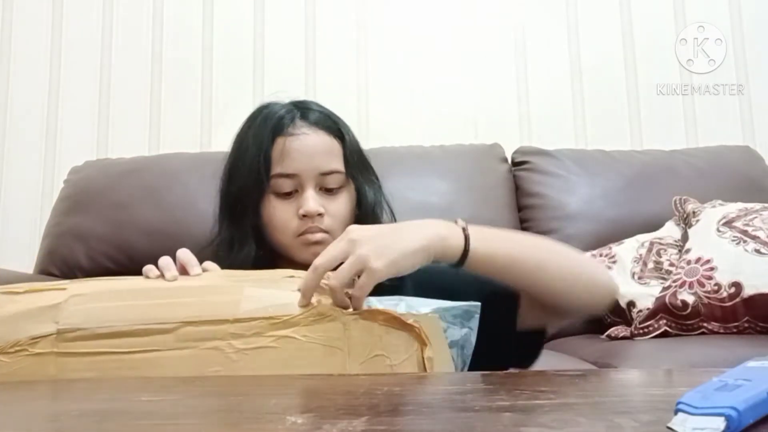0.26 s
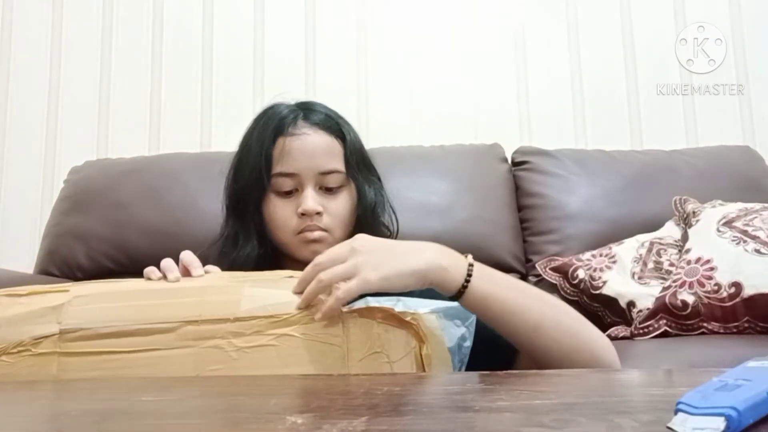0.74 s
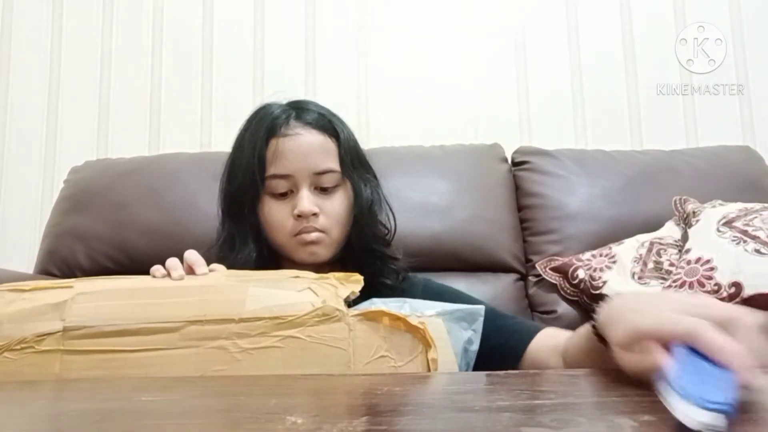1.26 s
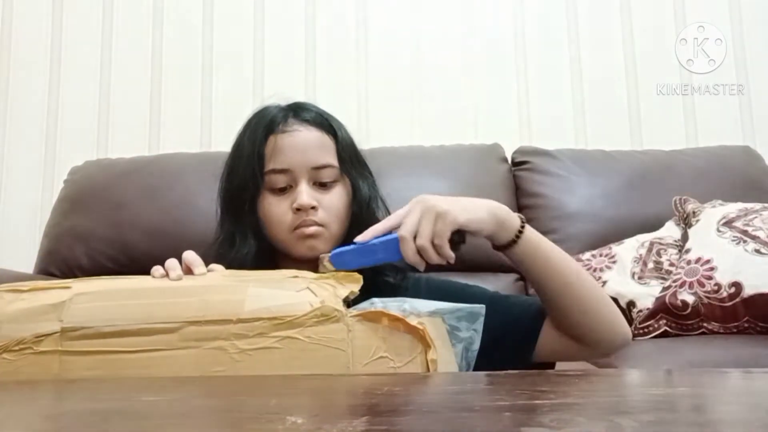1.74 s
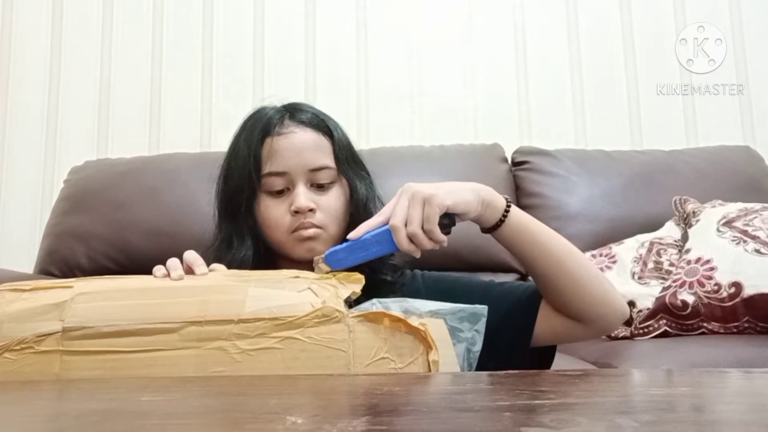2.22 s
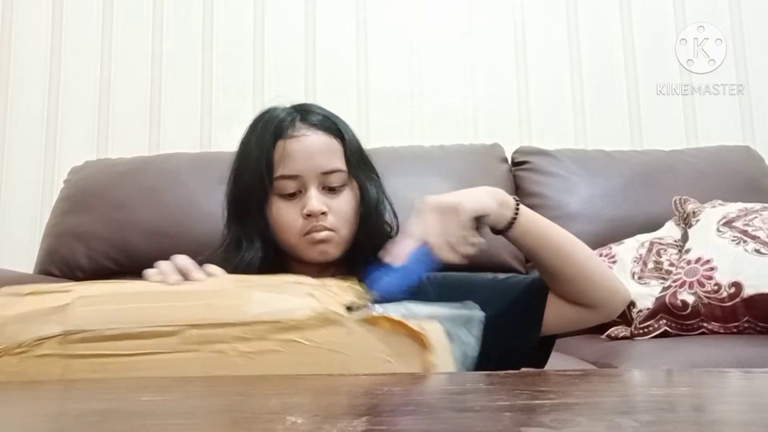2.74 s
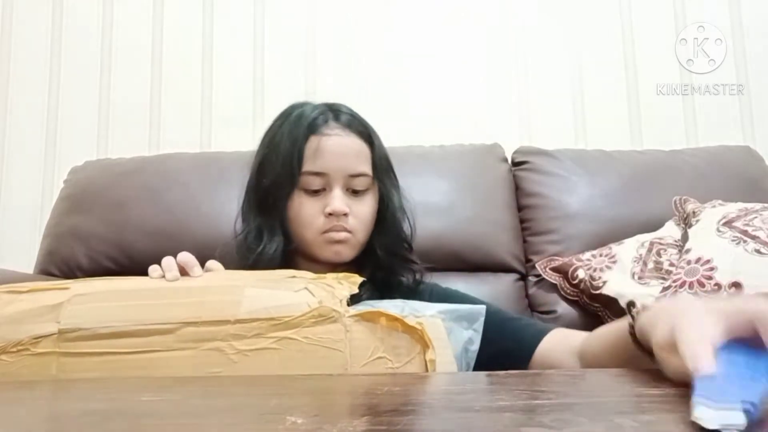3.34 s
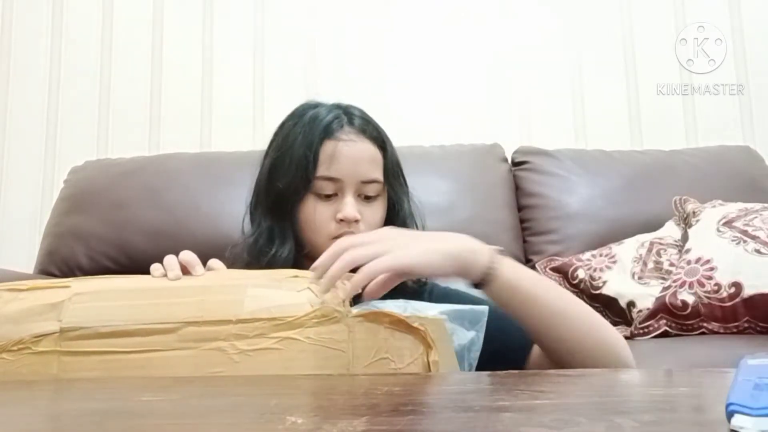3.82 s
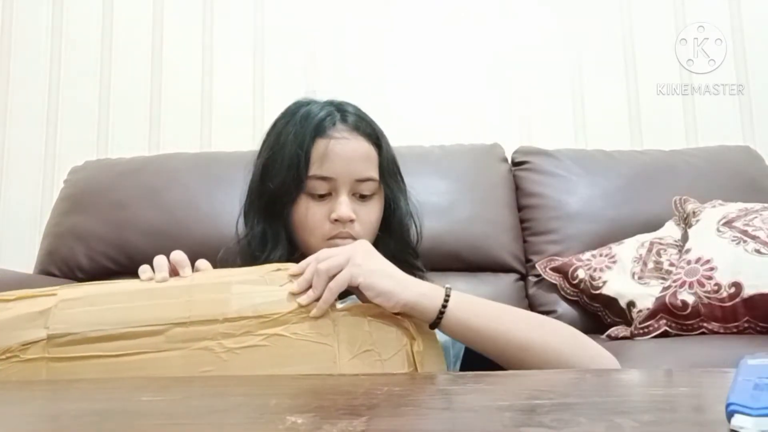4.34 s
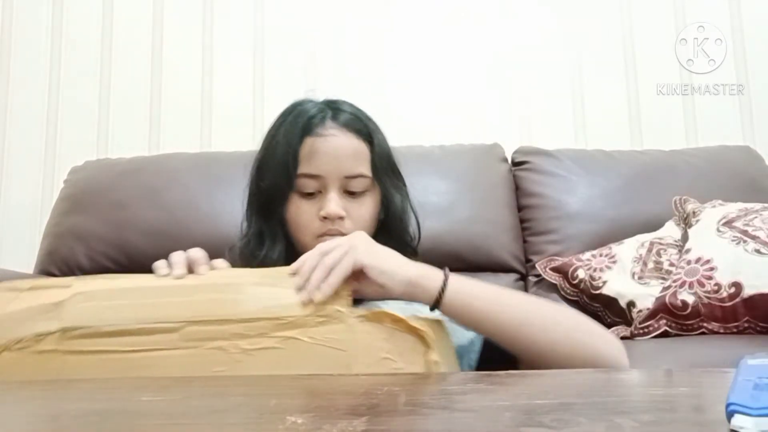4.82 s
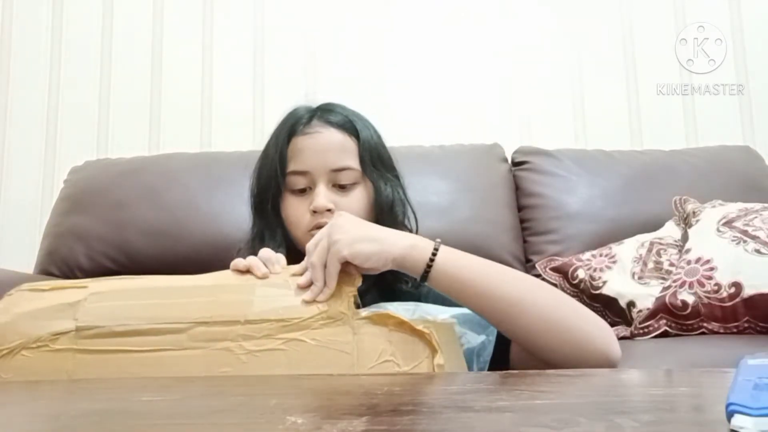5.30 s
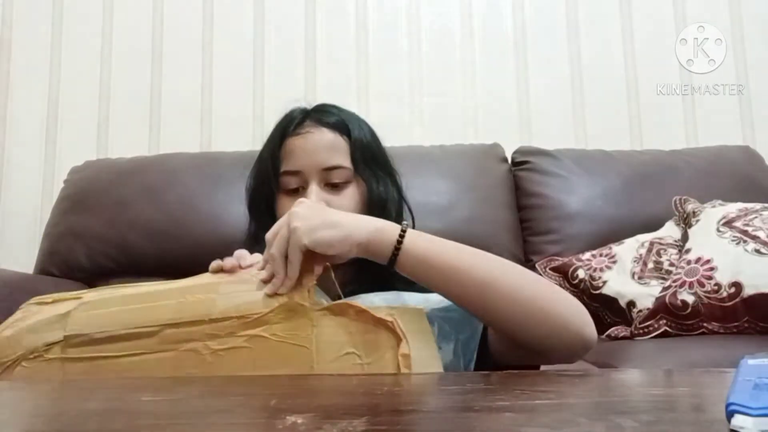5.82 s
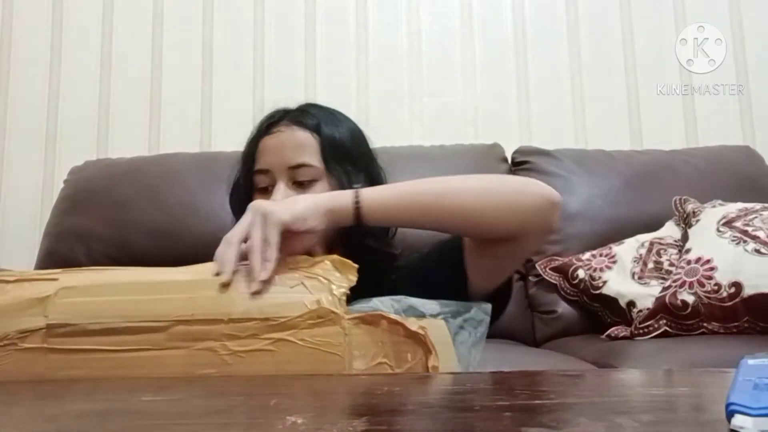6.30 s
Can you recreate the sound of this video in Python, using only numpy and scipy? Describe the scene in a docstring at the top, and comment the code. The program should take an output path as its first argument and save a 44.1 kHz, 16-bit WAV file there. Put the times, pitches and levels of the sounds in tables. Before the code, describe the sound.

Short rips and snaps of tape on a cardboard box, broken by one blade stroke and two clatters of a cutter on wood.

```python
"""A cardboard parcel is opened close to a phone in a living room, over a low rumble and a faint high hiss.
First the tape is picked at: its glue lets go in dense crackle and single snaps. At 1 s a plastic cutter
knocks on the wooden table as it is taken up. From 2.3 s it slits the tape in one stroke, jolting the
box, and at 3.3 s it is laid back, bouncing. From 3.9 s tape and wrap are peeled off in short pulls.
The room rings for half a second after each sound."""
import sys
import numpy as np
from scipy import signal
from scipy.fft import rfft, irfft
from scipy.io import wavfile
from scipy.ndimage import uniform_filter1d

SR = 44100
rng = np.random.default_rng(int(sys.argv[2]) if len(sys.argv) > 2 else 0)


def file_out(sig):
    """Save sig as 16-bit WAV at sys.argv[1]."""
    # one column per channel
    cols = np.atleast_2d(sig).T
    # limit, then scale
    lim = np.clip(cols, -1, 1)
    pcm = np.round(lim * 32767).astype(np.int16)
    wavfile.write(sys.argv[1], SR, pcm)


N = 289370
T = np.arange(N) / SR
SIDES = np.array([[.5], [-.5]])  # pan_db is left minus right


def undb(db):
    return 10 ** (np.asarray(db) / 20)


def unit_rms(x):
    return x / np.sqrt(np.mean(x ** 2))


def band(x, lo_hz, hi_hz, order=2):
    sos = signal.butter(order, [lo_hz, min(hi_hz, .45 * SR)], "bandpass", fs=SR, output="sos")
    return signal.sosfilt(sos, x)


def noise(size, corr):
    """Stereo white noise with the given left-right correlation."""
    mid, side = rng.standard_normal((2, size))
    return np.sqrt((1 + corr) / 2) * mid + np.sqrt((1 - corr) / 2) * side * 2 * SIDES


def wander(hold_samples):
    """Random levels, held and slewed; spread near 1."""
    steps = np.repeat(rng.standard_normal(N // hold_samples + 1), hold_samples)[:N]
    return uniform_filter1d(steps, size=hold_samples * 3 // 5)


def colour(x, points):
    """Minimum-phase filter through (freq_hz, gain_db) points, via the folded cepstrum."""
    hz, db = np.transpose(points)
    gain_db = np.interp(np.log(np.arange(4097) * SR / 8192 + 1), np.log(hz), db)
    cepstrum = irfft(gain_db * np.log(10) / 20)
    cepstrum[1:4096] *= 2
    cepstrum[4097:] = 0
    impulse = irfft(np.exp(rfft(cepstrum)))[None, :4096]
    return signal.fftconvolve(x, impulse, axes=1)[:, :N]


def curves_db(spans):
    """Level curves from spans of (time_s, level_db, ...) rows; silent between spans."""
    out = np.full((len(spans[0][0]) - 1, N), -120.)
    for rows in spans:
        time_s, *columns = np.transpose(rows)
        inside = (T >= time_s[0]) & (T <= time_s[-1])
        out[:, inside] = [np.interp(T[inside], time_s, column) for column in columns]
    return uniform_filter1d(out, size=200, axis=1)


def add(out, start_s, x):
    i = int(start_s * SR)
    out[:, i:i + x.shape[1]] += x[:, :N - i]


# rumble envelope: time_s, deep_db, upper_db
RUMBLE_LEVELS = [(0.0, -35, -35), (0.4, -40.5, -42), (0.64, -36.5, -38), (0.95, -40, -44.5),
                 (1.3, -38.5, -41), (1.8, -39.5, -42.5), (1.99, -36, -37.5), (2.43, -40.5, -38.5),
                 (2.74, -36, -30.5), (2.95, -38.5, -39.5), (3.45, -39, -42.5), (3.85, -48.5, -50),
                 (4.24, -45, -46), (4.35, -41.5, -44.5), (4.97, -41, -38.5), (5.24, -43, -41.5),
                 (5.5, -36.5, -40.5), (5.85, -40.5, -46), (6.12, -39, -40), (6.56, -38.5, -35.5)]
# broad rumble spectrum: freq_hz, gain_db
RUMBLE_SPECTRUM = [(15, -65), (25, -31), (43, -37), (66, -20), (107, 3.5), (209, 2), (295, -17.5),
                   (452, -40.5), (626, -47.5), (682, -64), (1500, -66), (1950, -101), (3300, -120)]
# low room modes: pitch_hz, width_hz, level_db
ROOM_MODES = [(85.6, 28, 0.5), (132, 25, -5.5), (177, 51, -6), (213, 40, -13.5), (297.4, 37, -14.5)]


def rumble():
    """Wavering noise caught in the low room modes."""
    deep_db, upper_db = curves_db([RUMBLE_LEVELS])
    air = noise(N, 0.17) * undb(3.46 * wander(2500))
    modes = sum(undb(db) * unit_rms(band(air, hz - width_hz / 2, hz + width_hz / 2, order=1))
                for hz, width_hz, db in ROOM_MODES)
    low = 0.31 * unit_rms(colour(air, RUMBLE_SPECTRUM)) + unit_rms(modes)
    low = band(low, 86.9, 324.6, order=3) + 0.13 * low
    deep = undb(deep_db) * unit_rms(band(low, 27, 191.5))
    upper = undb(upper_db) * unit_rms(band(low, 160.3, 770))
    return undb(-2 * SIDES) * (deep + upper)


def noise_floor():
    """Thin, steady, wide-band noise."""
    return undb(-72) * unit_rms(band(noise(N, 0.068), 900, 5500, order=1))


# pulls on the tape: peak_s, hold_s, fade_db_per_s, tape_db, paper_re_tape_db, board_re_tape_db
TAPE_PULLS = [(0.004, 0.0033, 107, -58.5, -15, -24), (0.14, 0.046, 113, -48.5, -9.5, -1.5),
              (0.36, 0.067, 250, -39.5, -7, -25), (0.574, 0.0056, 211, -44.5, -14, -7.5),
              (0.724, 0.0029, 250, -49.5, -13, -25), (0.804, 0.0041, 401, -53, -14, -11),
              (1.793, 0.0038, 335, -55.5, 1, -4.5), (2.225, 0.0044, 306, -60, -11, -20),
              (3.863, 0.026, 170, -52.5, 6, -13), (3.925, 0.0092, 196, -47, -15, -32),
              (4.188, 0.0041, 155, -56.5, 4, -11), (4.275, 0.033, 272, -43, -0.5, -1),
              (4.39, 0.015, 171, -45, -7, 5.5), (4.552, 0.074, 155, -41.5, -5, -11),
              (4.652, 0.052, 204, -42, -3.5, 2), (4.749, 0.0046, 184, -36, -7.5, -8),
              (4.85, 0.0036, 200, -39.5, -1.5, -5), (4.971, 0.032, 106, -42.5, 2.5, 6),
              (5.288, 0.0017, 249, -37, -10.5, -19.5), (5.39, 0.084, 141.5, -51.5, -29, -30),
              (5.5, 0.07, 150, -51, -0.5, -26), (5.581, 0.028, 163, -28, -4, -6),
              (5.684, 0.0068, 223, -46, 7.5, 1), (5.865, 0.082, 142, -49, 1.5, -1),
              (5.966, 0.13, 150, -40.5, -10, -17), (6.084, 0.09, 214, -36.5, -6.5, -5.5),
              (6.186, 0.0039, 241, -39.5, -0.5, -1.5), (6.271, 0.014, 189, -31.5, -1, -14),
              (6.45, 0.13, 100, -52, 2.5, 0.5)]


def pull_power():
    """Power of tape, paper and cardboard: each pull swells, holds and fades."""
    rise_db_per_s = 700
    power = np.zeros((3, N))
    for peak_s, hold_s, fade_db_per_s, tape_db, paper_db, board_db in TAPE_PULLS:
        rise_db = np.minimum(rise_db_per_s * (T - peak_s), 0)
        fade_db = fade_db_per_s * np.maximum(T - peak_s - hold_s, 0)
        gains = undb(tape_db + np.array([[0], [paper_db], [board_db]]))
        power += (gains * undb(rise_db - fade_db)) ** 2
    return power


def crackle(rate_per_s, spread_db, grain_ms):
    """Envelope of glue threads letting go: short puffs at random, a few much louder."""
    breaks = (rng.random(N) < rate_per_s / SR) * undb(spread_db * rng.exponential(size=N))
    pole = np.exp(-1000 / (grain_ms * SR))
    return unit_rms(signal.lfilter([1], [1, -pole], breaks))


def sheet(drive, bands_hz, tilt_db_per_oct, flicker_db, hold_s, corr):
    """Creased sheet: each patch rings in its own narrow band and flickers on its own."""
    out = np.zeros((2, N))
    for hz in bands_hz:
        level_db = tilt_db_per_oct * np.log2(hz) + flicker_db * wander(int(hold_s * SR))
        out += undb(level_db) * unit_rms(band(noise(N, corr) * drive, hz / 1.104, hz * 1.113))
    return unit_rms(out)


def peel(power):
    """One stick-slip crackle drives tape, paper and cardboard; single threads tick on top."""
    tape_gain, paper_gain, board_gain = np.sqrt(power)
    fine = crackle(rate_per_s=350, spread_db=3, grain_ms=3.5)
    coarse = crackle(rate_per_s=190, spread_db=0.5, grain_ms=22)
    tape = sheet(fine + 3.7 * coarse + 0.18, bands_hz=(5430, 7460, 10400, 12900, 14700),
                 tilt_db_per_oct=1.2, flicker_db=3.5, hold_s=.02, corr=0.21)
    paper = sheet(fine + 0.49 * coarse + 0.92, bands_hz=(1503, 2030, 2610, 3283, 4240),
                  tilt_db_per_oct=-0.5, flicker_db=4, hold_s=.045, corr=0.25)
    board = sheet(coarse + 0.79, bands_hz=(409, 532, 759, 865, 1157),
                  tilt_db_per_oct=0, flicker_db=5, hold_s=.035, corr=0.27)
    threads = noise(N, 0.44) * crackle(rate_per_s=160, spread_db=2.5, grain_ms=0.6)
    ticks = undb(-8.5) * unit_rms(band(threads, 1500, 17000))
    return tape_gain * (tape + ticks) + paper_gain * paper + board_gain * board


def burst(decay_ms, lo_hz, hi_hz, corr):
    """Puff of band noise: fast rise, slower fade, mono peak 1."""
    t_ms = np.arange(1500) * 1000 / SR
    envelope = (1 - np.exp(-t_ms / 0.26)) * np.exp(-t_ms / decay_ms)
    puff = band(noise(len(t_ms), corr) * envelope, lo_hz, hi_hz)
    return puff / np.abs(puff.mean(axis=0)).max()


# glue snaps: start_s, tape_db, flap_re_tape_db, flap_hz, board_re_tape_db
GLUE_SNAPS = [(0.134, -30, -2.5, 2440, -15), (0.197, -38.5, -12, 1130, 1), (0.155, -20.5, -24, 2130, -30),
              (0.161, -32, -11, 4300, -28), (0.277, -34.5, -12, 4200, -28), (0.3405, -33, -20, 4100, -40),
              (0.23, -30, -6, 4430, -29), (0.347, -11.5, -34, 4100, -50), (0.378, -20, -30, 4360, -34),
              (0.401, -31, 0, 2150, -10), (0.4283, -27.5, -0.5, 2260, -6.5), (0.541, -27, 0, 4170, -47),
              (0.562, -39.5, -1.5, 1640, -20), (0.6417, -37, -29, 1670, -25), (0.7103, -37, -15, 4600, -18),
              (1.783, -26, -10.5, 4230, -24.5), (1.79, -27, -18.5, 4230, -27),
              (2.0595, -28, -9.5, 2620, -31.5), (2.217, -35.5, -17, 4200, -19),
              (2.226, -37, -16, 4200, -30), (2.015, -46.5, -24.5, 4200, -38.5),
              (2.35, -16, -12.5, 2660, -7), (2.384, -19.5, -4, 2560, -12), (2.5519, -4, -22, 2660, -19.5),
              (2.5694, -10.5, -16, 2200, -10.5), (2.7228, -11.5, -12, 2000, -2.5),
              (2.7285, -10, -16, 2000, -7), (2.744, -4.5, -14, 4400, -17), (2.748, -5.5, -12, 4400, -19),
              (2.7545, -11, 0, 1490, -6), (2.7784, -15.5, 5, 1520, 1), (2.807, -15.5, 5.5, 2080, -1),
              (3.0804, -30.5, -23, 2010, -32.5), (3.108, -41.5, -12, 4800, -30),
              (3.197, -48.5, -26, 4260, -23.5), (3.853, -31.5, 9.5, 1476, -16),
              (3.9161, -17, -39, 1950, -50), (3.9233, -22, -34, 1900, -29), (4.138, -26, -10, 4200, -30),
              (4.1715, -21.5, -15.5, 2500, -33), (4.262, -14.5, -4.5, 2490, -21),
              (4.2801, -24, -5, 2400, -2), (4.3805, -15.5, -8.5, 1660, -8), (4.501, -21, -11.5, 2000, -38),
              (4.5706, -28, -2.5, 2170, -20), (4.642, -12.5, 3.5, 2030, -1), (4.724, -31, -15, 4400, -30),
              (4.755, -27, -18, 4400, -30), (4.855, -29, -10, 4200, -25), (4.874, -37, -14, 4200, -25),
              (4.8, -35.5, 2, 1490, 2), (4.806, -16.5, -21, 1950, -23), (4.835, -25, 2, 1560, 0.5),
              (4.939, -39.5, 4, 1540, -7), (4.9686, -32, 11, 1700, 6.5), (5.0454, -32.5, 1, 1660, 5.5),
              (5.0737, -33, 5, 1600, -1), (5.0803, -20.5, -16, 2140, -17), (5.1023, -42, 5, 1070, 9),
              (5.213, -24, -23, 2130, -38), (5.25, -22, -13, 4540, -50), (5.4022, -35, -38, 1980, -31),
              (5.427, -31, -34.5, 4150, -39), (5.4965, -28, -5.5, 3010, -35),
              (5.5476, -22.5, -13, 1960, -37), (5.5658, -20.5, -8, 1930, -9), (5.5975, -6, -5, 1410, -12.5),
              (5.611, -28, -11, 1880, -3), (5.683, -31, 10, 1270, 6), (5.6924, -35, 11, 1900, 0),
              (5.8226, -33, -2, 2090, -6), (5.8544, -30.5, 17.5, 1990, -0.5), (5.9284, -41, 4, 2170, -13),
              (5.979, -35, -8, 4400, -30), (6.101, -29, -8, 3300, -9), (6.024, -24, -1.5, 4400, -33),
              (6.0787, -21.5, -7, 3330, 1.5), (6.2517, -26, -21, 2600, -20), (6.2598, -28, -1, 4340, -20),
              (6.2853, -14, 4, 2000, -0.5), (6.304, -27, -8, 4000, 4.5), (6.4436, -36, -3, 1680, 6),
              (6.528, -45, 3, 1500, -2)]


def snaps():
    """A patch of glue gives at once: tape cracks, the freed flap pings, cardboard answers."""
    out = np.zeros((2, N))
    decay_ms = 2.3
    for start_s, tape_db, flap_db, flap_hz, board_db in GLUE_SNAPS:
        pan_db = -1 + 0.5 * rng.standard_normal()
        ping_share = np.clip((-14 - tape_db - flap_db) / 15.5, 0.15, 0.8)  # gentle snaps ping more
        crack = burst(0.94 * decay_ms, 1100, 5200, corr=0.55)
        ping = burst(2.1 * decay_ms, flap_hz / 1.15, flap_hz * 1.15, corr=0.42)
        flap = (1.1 - 0.75 * ping_share) * crack + ping_share * min(3400 / flap_hz, 1) * ping
        tape = 0.67 * burst(decay_ms, 6300, 17700, corr=0.31)
        click = 0.77 * burst(0.16 * decay_ms, 4000, 16000, corr=0.77)
        board = burst(1.88 * decay_ms, 350, 1160, corr=0.73)
        snap = tape + click + undb(flap_db) * flap + undb(board_db) * board
        add(out, start_s - .0005, undb(tape_db + pan_db * SIDES) * snap)
    return out


# hiss envelopes, one list per swell: time_s, level_db
HISS_SWELLS = [
    [(0.8, -80), (0.89, -61), (1.03, -73)],
    [(1.39, -80), (1.43, -69.5), (1.76, -78.5)],
    [(3.74, -86), (3.83, -72), (3.86, -76)],
]


def hiss():
    """Three faint swells of narrow noise near 7 kHz."""
    return undb(curves_db(HISS_SWELLS)[0]) * unit_rms(band(noise(N, .1), 6720, 7050, order=3))


# modes of table top and cutter: pitch_hz, level_db, t60_s
KNOCK_MODES = [(170, -6.5, 0.059), (204, -5.5, 0.039), (250, -5, 0.031), (299.8, -7, 0.042),
               (379, -9, 0.024), (494, 10.5, 0.023), (539, -8.5, 0.076), (604.6, -1, 0.031),
               (699.5, 7, 0.039), (773, -2, 0.044), (834, -5.5, 0.03), (1176, 2.5, 0.019), (1260, 1, 0.026),
               (1354, -2.5, 0.04), (1550, -12.5, .016), (1800, -6, 0.0034), (2060, 0, 0.015),
               (2252, 3.5, 0.022), (3000, -14, .012)]
# cutter on the table: start_s, blow_db, rattle_re_blow_db, pan_db, low_modes_db
CUTTER_KNOCKS = [(1.027, -26.5, -16, 2, 0), (1.062, -14.5, -22, 4.5, 3), (1.069, -20, -18, 5.5, -2),
                 (1.113, -1, -10.5, 3, -6.5), (1.133, -4, -11.5, 1.5, -5.5), (1.154, -8, -13.5, -1, -4.5),
                 (1.173, -12.5, -28, 0, -4), (1.242, -17.5, -31, -12.5, 16.5), (3.345, 1, -16, 1, -3.5),
                 (3.467, -16, -25, -3.5, 12), (3.474, -2, -6.5, 1.5, 12), (3.497, -8.5, -20.5, -7.5, 7.5),
                 (3.511, -12, -27.5, 0, 4), (3.538, -16.5, -22, 1, 8)]


def knocks():
    """Each blow rings the same modes with new strengths; the loose blade rattles on top."""
    out, t = np.zeros((2, N)), np.arange(6000) / SR
    pitch_hz, level_db, t60_s = np.transpose(KNOCK_MODES)[:, :, None]
    attack = 1 - np.exp(-t / 0.00096)
    for start_s, blow_db, rattle_db, pan_db, low_modes_db in CUTTER_KNOCKS:
        strength, left, right, detune = rng.standard_normal((4, len(KNOCK_MODES), 1))
        hz = pitch_hz * (1 + 0.012 * detune)  # grip and contact vary
        envelopes = undb(level_db + low_modes_db * (hz < 720) + 2 * strength - 60 * t / t60_s)
        port_phases = 1.42 * np.array([left, right]) * np.sqrt(hz / 900)
        modes = np.sum(envelopes * np.sin(2 * np.pi * hz * t + port_phases), axis=1)
        ring = attack * modes / np.abs(modes.mean(axis=0)).max()
        rattle = 1.16 * burst(3.4, 3400, 8900, corr=0.35) + 2.04 * burst(1.1, 10500, 24000, corr=0.44)
        add(out, start_s - .0007, undb(blow_db + pan_db * SIDES) * ring)
        add(out, start_s, undb(blow_db + rattle_db + pan_db * SIDES) * rattle)
        add(out, start_s, undb(blow_db - 7.5) * burst(7.9, 370, 2300, corr=0.33))
    return band(out, 140, 17000)


# jolts of box or table top: start_s, level_db, pitch_hz, t60_s
JOLTS = [(1.063, -17, 190.6, 0.06), (3.346, -16.5, 180, 0.055), (3.475, -15, 231, 0.05),
         (2.659, -21.5, 302, 0.051), (2.721, -4.5, 265, 0.025), (2.752, -18, 230, 0.027),
         (2.783, -17, 305, 0.045), (4.378, -16, 452, 0.03), (4.642, -27, 450, 0.027),
         (4.661, -30, 460, 0.039), (4.967, -23, 312, 0.034), (4.989, -26, 325, 0.026),
         (5.015, -25, 262, 0.034), (5.597, -17.5, 315, 0.037), (5.612, -20, 392, 0.032),
         (6.079, -22, 432, 0.023), (6.098, -24.5, 383, 0.038), (6.284, -17, 473, 0.017),
         (6.304, -24, 546, 0.027)]


def thumps():
    """The hollow box or the table top answers a jolt with a low, damped note and its overtone."""
    out, t = np.zeros((2, N)), np.arange(5000) / SR
    attack = 1 - np.exp(-t / 0.0029)
    for start_s, level_db, pitch_hz, t60_s in JOLTS:
        fundamental = np.sin(2 * np.pi * pitch_hz * t)
        overtone = 0.26 * np.sin(2 * np.pi * 1.65 * pitch_hz * t) * undb(-40 * t / t60_s)
        note = (fundamental + overtone) * attack * undb(level_db - 60 * t / t60_s)
        add(out, start_s, note[None])
    return band(out, 110, 4000)


# blade stroke: time_s, tape_db, paper_db, board_db
SLIT_LEVELS = [(2.31, -68, -78, -78), (2.38, -42, -39, -36.5), (2.45, -35.5, -38, -35),
               (2.496, -46.5, -48, -43.5), (2.55, -28.5, -28.5, -29), (2.632, -38, -38.5, -41.5),
               (2.67, -30.5, -33.5, -37), (2.73, -25, -27, -29), (2.796, -23, -24, -28),
               (2.916, -43.5, -37.5, -42.5), (3.2, -77, -74.5, -92.5)]


def slit_power():
    """Power of tape, paper and cardboard as the blade slits the tape in one long stroke."""
    return undb(curves_db([SLIT_LEVELS])) ** 2


# reverberation bands: centre_hz, t60_s, density_db
ROOM_BANDS = [(226, 0.49, -4), (595, 0.34, 1), (1530, 0.42, -3.5), (3180, 0.47, -9), (7600, 0.47, -11),
              (13000, 0.18, -5.5)]


def room(x):
    """Diffuse tail: each band has its own decay, left and right nearly unrelated."""
    t = np.arange(int(.7 * SR)) / SR
    tail = np.zeros((2, len(t)))
    for hz, t60_s, density_db in ROOM_BANDS:
        reflections = unit_rms(band(noise(len(t), 0.031), hz / 1.71, hz * 1.65))
        tail += undb(density_db - 60 * t / t60_s) * reflections * np.sqrt(hz / 8000)
    tail *= np.clip((t - .003) / 0.014, 0, 1)  # first walls answer after 3 ms
    return signal.fftconvolve(x.mean(axis=0)[None], tail, axes=1)[:, :N]


def scene():
    """Close parcel and cutter, their room tail and the background."""
    wrap = peel(pull_power() + slit_power())
    glue, cutter, box = snaps(), knocks(), thumps()
    left, right = wrap + glue + cutter + box
    port_lag_samples = 5
    direct = np.array([np.roll(left, port_lag_samples), right])
    send = undb(-36.5) * wrap + undb(-33.5) * glue + undb(-32.5) * cutter + undb(-34) * box
    return direct + room(send) + rumble() + hiss() + noise_floor()


# noise suppressor bands: lo_hz, hi_hz, knee_db, slope_db_per_db, floor_db
SUPPRESSOR_BANDS = [(2480, 6600, -66, 1.0, -8), (7300, 12000, -68, 1.2, -28),
                    (10000, 12000, -56.5, 1, -18.5)]


def suppress(x):
    """Noise suppressor: each band is turned down once its level falls under the knee."""
    for lo_hz, hi_hz, knee_db, slope_db_per_db, floor_db in SUPPRESSOR_BANDS:
        sos = signal.butter(2, [lo_hz, hi_hz], "bandpass", fs=SR, output="sos")
        part = signal.sosfiltfilt(sos, x)
        power = uniform_filter1d(np.mean(part ** 2, axis=0), size=500)
        level_db = 10 * np.log10(power + 1e-12)
        gain_db = np.clip(slope_db_per_db * (level_db - knee_db), floor_db, 0)
        x = x + (undb(gain_db) - 1) * part
    return x


# microphone port resonances: freq_hz, gain_db
PORT_RESPONSE = [(100, 11.5), (1000, 1), (1700, 1.5), (2250, 4), (2800, 1.5), (3350, 0), (4300, 4.5),
                 (5000, -1.5), (5800, -1.5), (7000, 6.5), (8400, 5.5), (9600, 0.5), (13000, -1.5),
                 (15500, -1.5)]


def record(dry):
    """Phone: close ports hear nearly the same bass; resonances, suppressor, clipping, low-pass."""
    mid, side = dry.mean(axis=0), (dry[0] - dry[1]) / 2
    side = 0.33 * side + 0.71 * band(side, 420, 18000, order=3)
    ports = colour(np.array([mid + side, mid - side]), PORT_RESPONSE)
    clipped = np.clip(suppress(ports), -.88, .88)
    return signal.sosfilt(signal.ellip(12, .2, 100, 15700, fs=SR, output="sos"), clipped)


dry = scene()
out = record(dry)
file_out(out)
```